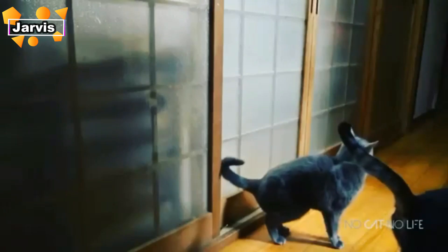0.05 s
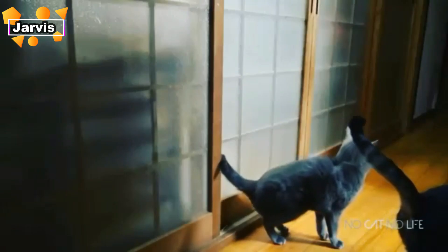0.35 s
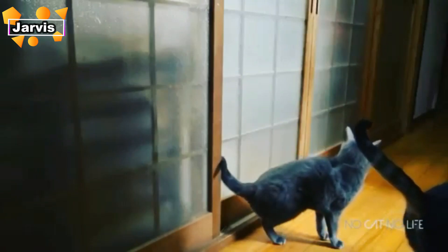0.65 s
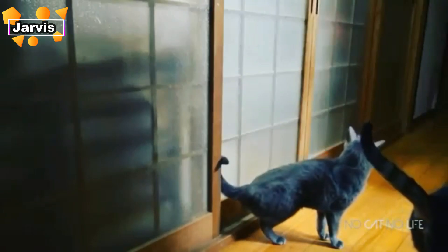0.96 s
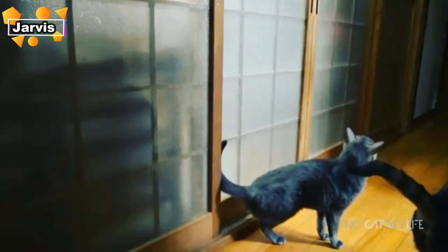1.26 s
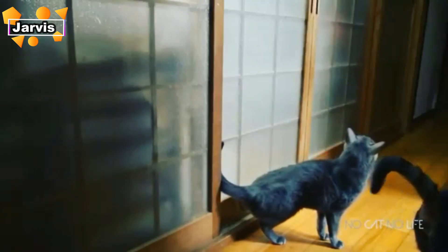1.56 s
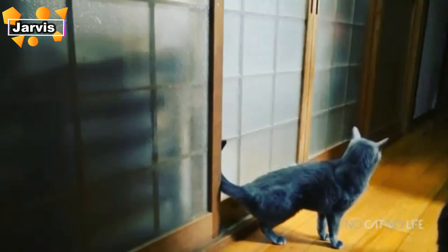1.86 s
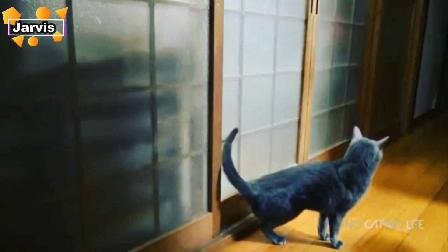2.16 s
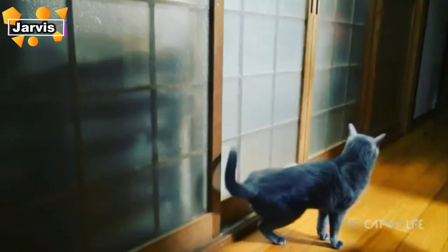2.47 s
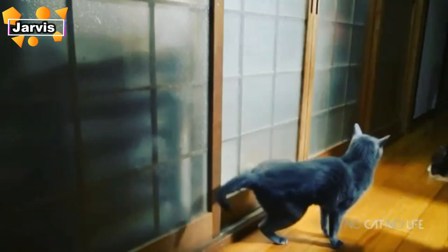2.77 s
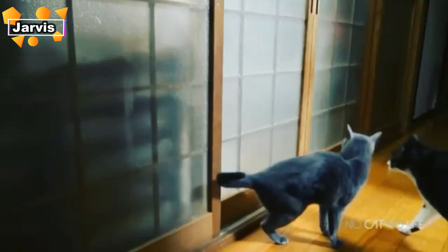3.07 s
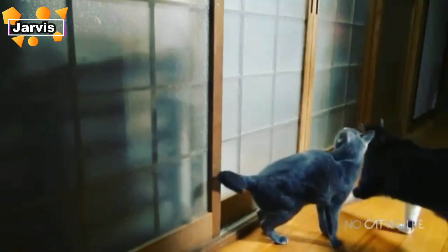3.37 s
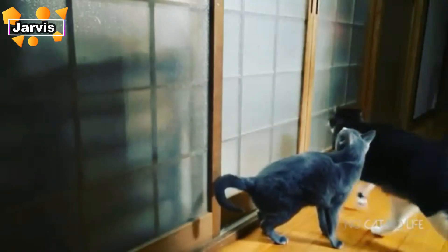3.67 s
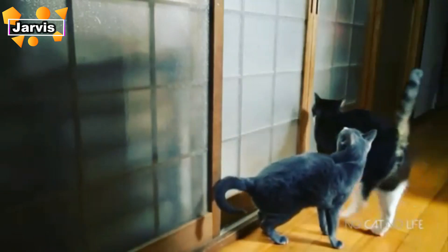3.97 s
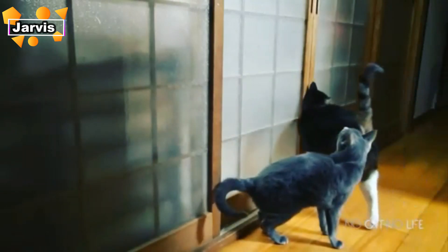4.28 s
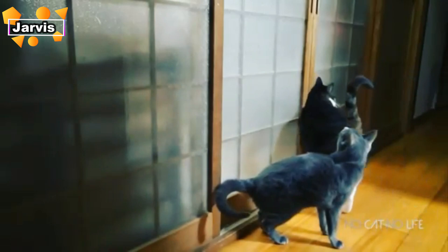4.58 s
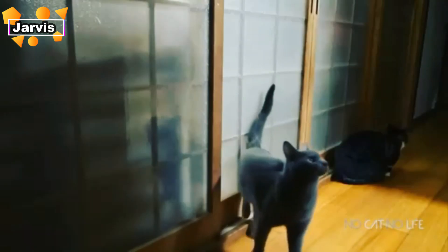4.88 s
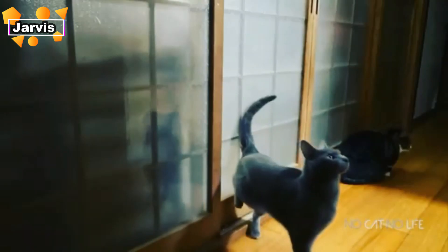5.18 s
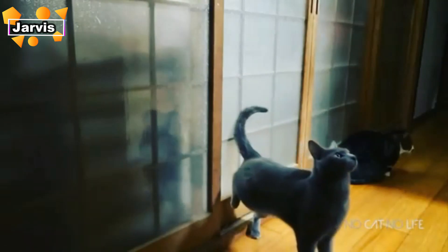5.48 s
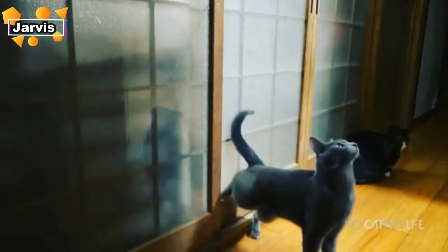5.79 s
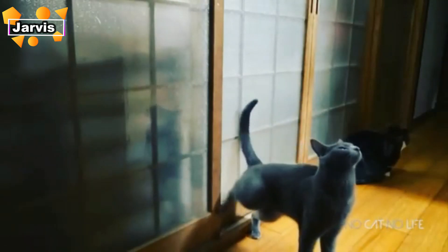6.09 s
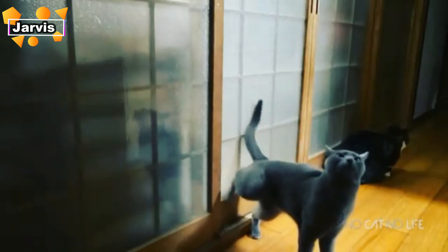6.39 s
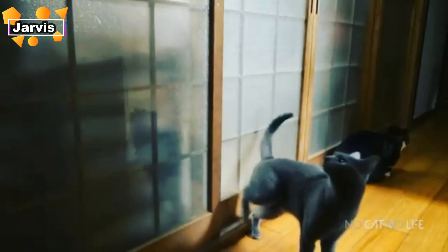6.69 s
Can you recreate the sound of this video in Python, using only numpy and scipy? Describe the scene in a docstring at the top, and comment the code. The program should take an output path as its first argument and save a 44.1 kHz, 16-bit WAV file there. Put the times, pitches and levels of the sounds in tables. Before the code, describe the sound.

In a quiet indoor hallway with a faint appliance hum, a cat's fur brushes softly against wood. A wooden sliding door then knocks and rattles, its loose glass panes chattering, with a brief scrape in the track and a sharp claw skid. One hard crack follows, then soft paw thumps. After a lull, the door clatters again with short glassy rings. The microphone picks up a little room reverberation.

```python
"""A wooden sliding door with frosted glass panes knocks and rattles as cats push at it in a hallway.
Each impact excites the frame's normal modes and sets the loose panes chattering; some ring out.
Friction in the track makes the runner grate and squeak, and claws skid on the floor by stick-slip.
Between the bouts come soft paw falls, fur brushing the wood and the hum of an appliance."""
import sys
import numpy as np
from scipy import signal
from scipy.fft import rfft, irfft
from scipy.io import wavfile
from scipy.ndimage import uniform_filter1d

SR = 44100
rng = np.random.default_rng(int(sys.argv[2]) if len(sys.argv) > 2 else 0)


def persist_wave(psi):
    """Save psi, clipped to +-1, as 16-bit WAV."""
    counts = np.round(np.clip(psi, -1, 1) * 32767).astype(np.int16)
    wavfile.write(sys.argv[1], SR, np.atleast_2d(counts).T)


N = 297322
T = np.arange(N) / SR
AGE = T[:SR]  # time since an onset [s]


# normal modes of the wooden frame: (frequency [Hz], relative level [dB], t60 [s])
FRAME_MODES = [(81, -8.5, 0.88), (139, 1, 1), (211.7, -3, 0.8), (272.9, 1.5, 0.33), (312, 2, 0.84),
               (349.5, 0, 0.76), (381, -5.5, 0.67), (461.4, -2.5, 0.81), (509, 1, 0.85), (552.3, 3, 0.47),
               (590, 0, 0.5), (672, 2.5, 0.4), (743, 2, 0.42), (797, -14, 0.54), (904, -7, 0.86),
               (1021, 0.5, 0.92), (1093, 2.5, 0.72)]
def frame_modes():
    """Normal modes: each vibrates freely as a damped sinusoid."""
    return np.array([undb(db) * unit(np.cos(2 * np.pi * hz * AGE) * fade(t60))
                     for hz, db, t60 in FRAME_MODES])


# frequency response of the door: (frequency [Hz], gain [dB])
DOOR_RESPONSE = [(25, -38), (50, 11.5), (85, 22.5), (140, 20), (350, 18.5), (600, 12.5), (900, 7),
                 (1700, 4.5), (2500, -3.5), (3800, -9.5), (6500, -12), (9000, -17), (12000, -27.5),
                 (15500, -46)]
def door_ring(modes, push_db=-5, buzz_db=-2, clink_db=-7, modes_db=-19, hall_db=1, size=4096):
    """Impulse response of one contact: push, glass buzzing in its groove, modes and reverberation."""
    buzz = rng.standard_normal(size) * rng.exponential(size=size)
    buzz *= (rise(0.0065) * fade(0.086))[:size]
    buzz = unit(signal.lfilter(*signal.butter(1, 300, "high", fs=SR), buzz))
    push = signal.lfilter(*signal.butter(1, 4000, fs=SR), bending_wave(size))
    direct = undb(push_db) * push + undb(buzz_db) * buzz + undb(clink_db) * clink(size)
    coupling = 1 + 0.49 * rng.standard_normal(len(modes))  # each contact point favours other modes
    ring = undb(modes_db) * coupling @ modes / np.sqrt(len(modes) / 2)
    ring += undb(hall_db) * signal.fftconvolve(direct, hallway())[:SR]
    ring[:size] += direct
    return colour(ring, DOOR_RESPONSE)


def bending_wave(size, delay_at_1khz_s=0.002219):
    """Dispersion in a plate: wave speed goes with the root of frequency, so treble arrives first."""
    hz = np.fft.rfftfreq(size, 1 / SR)
    return irfft(np.exp(-4j * np.pi * delay_at_1khz_s * np.sqrt(1000 * hz)))


def clink(size, low_hz=800, high_hz=11000, count=30):
    """Edge damping: a pane held in wood rings briefly, at pitches set by where it touches."""
    place, share, phase = rng.random((count, 3)).T[..., None]
    hz = low_hz * (high_hz / low_hz) ** place
    tones = share * np.sqrt(hz) * np.sin(2 * np.pi * (hz * AGE[:size] + phase))
    return unit(tones.sum(0) * (rise(0.0031) * fade(0.05))[:size])


# door impacts: (time [s], gain [dB], relative pane clatter [dB], relative edge tick [dB])
IMPACTS = [(2.492, -10, -6.5, -10), (2.571, -6, -15, 2), (2.779, -1, -23, -5), (2.807, -4.5, -17, -28),
           (2.869, -2.5, -0.5, 5.5), (2.893, 2, -1, 2), (2.945, 5, 1, 9), (2.963, 8, 2.5, -2.5),
           (2.984, -3, 5, -2), (3.020, 2.5, -11, 1), (3.038, 2.5, -9, 1), (3.055, -2, 1, 5),
           (3.069, -6.5, 2, -2), (3.123, -3.5, -6, 16), (3.8233, -2, 0, -2), (3.841, -7.5, 3, -3),
           (6.227, 0, -5.5, -2), (6.249, -0.5, -3, -3), (6.344, -2.5, -2.5, -11), (6.428, -2.5, 3, -1.5),
           (6.513, -0.5, 6, 3.5), (6.611, 7, -8.5, 1.5), (6.620, 2, -4.5, 1), (6.639, 3, -4, -10),
           (6.668, -10, -4, 6), (6.701, 1.5, -1.5, -4.5), (6.715, -3.5, 6, -24)]
def knocks(modes):
    """Energy partition: the more of a knock on track or frame enters the glass, the less wood thumps."""
    out = np.zeros(N)
    for s, db, pane_db, tick_db in IMPACTS:
        thump_db = -2.5 - 0.25 * pane_db
        contact = [(160, thump_db), (340, 0.0093), (650, 0.0074), (1700, pane_db), (2800, pane_db),
                   (5500, tick_db), (12000, tick_db - 0.5)]
        add(out, s, undb(db) * colour(door_ring(modes), contact))
    return out


def shaking(base_db=-34.5, db_per_impact_db=1.44, wood_t60=0.6, glass_t60=0.54, glass_db=2):
    """Energy summation: each impact adds to the panes' tapping on wood and glass, which then decays."""
    wood, glass = np.zeros(N), np.zeros(N)
    for s, db, _, _ in IMPACTS:
        swell = undb(base_db + db_per_impact_db * db) * rise(0.0053)
        add(wood, s, (swell * fade(wood_t60)) ** 2)
        add(glass, s, (swell * fade(glass_t60)) ** 2)
    return np.sqrt(wood), undb(glass_db) * np.sqrt(glass)


def chatter(modes, taps_per_s=220, split_hz=800, panes=3):
    """Rattle across a clearance: loose panes tap at random, dull on wood and bright on glass."""
    tap_spectrum = [(100, 0.5), (230, -1.5), (400, -0.5), (700, 4), (1000, 0), (1600, -1),
                    (3000, 3), (6000, -10.5)]
    on_wood, on_glass = shaking()
    out = np.zeros(N)
    for _ in range(panes):
        taps = clicks(taps_per_s / panes, spread_db=4.5)
        dull = signal.sosfiltfilt(signal.butter(2, split_hz, fs=SR, output="sos"), taps)
        ring = unit(colour(door_ring(modes), tap_spectrum))
        out += signal.fftconvolve(on_wood * dull + on_glass * (taps - dull), ring)[:N]
    return out / np.sqrt(panes)


# modes of each loose pane: (frequency [Hz], relative level [dB], t60 [s])
GLASS_MODES = {"large": [(412.4, 0.5, 0.23), (501, -1, 0.25), (631, -5, 0.24), (776, -4, .2),
               (1001, -2.5, 0.26), (1560, -9, .25), (1700, -5, .22), (2650, -15, 0.2)],
               "middle": [(1204, -9, 0.29), (1308, -0.5, 0.44), (1373, -4.5, 0.49), (1780, -2, 0.56),
               (1996, -10, 0.37), (2110, -9.5, 0.42), (2446, 0, .18), (4226, -10, 0.42)],
               "small": [(817, 2, 0.24), (974, 3, 0.09), (1060, 0.5, 0.14), (1647, 6, 0.085),
               (1698, -0.5, 0.14), (1900, 2, 0.1), (2000, -0.5, .08), (2560, -4, 0.13), (3200, -7, 0.065)]}
# square hits of a pane on its groove: (time [s], pane, level [dB])
PANE_HITS = [(2.893, "middle", -39), (2.953, "middle", -28), (3.056, "middle", -49),
             (3.824, "large", -28.5), (6.227, "small", -41), (6.344, "small", -35), (6.430, "small", -23.5),
             (6.518, "small", -23), (6.701, "small", -44)]
def pings(detune=0.004, spread_db=1.5):
    """Free vibration: a struck pane rings in its own modes, which shift with its seat in the groove."""
    out = np.zeros(N)
    for s, pane, db in PANE_HITS:
        hz, mode_db, t60 = np.transpose(GLASS_MODES[pane])[..., None]
        hz = hz * (1 + detune * rng.standard_normal(hz.shape))
        amplitude = np.sqrt(2) * unit(undb(mode_db + spread_db * rng.standard_normal(hz.shape)))
        tones = amplitude * np.sin(2 * np.pi * (hz * AGE + rng.random(hz.shape))) * fade(t60)
        add(out, s, undb(db) * in_hall(tones.sum(0) * rise(0.00092), hall_db=-9))
    return out


# sways of the shoved door: (time [s], frequency [Hz], level [dB])
SWAYS = [(2.575, 78.7, -26), (2.611, 78, -31.5), (2.777, 174, -31), (2.854, 134, -15.5), (2.938, 131, -12),
         (2.963, 490, -12), (3.020, 216, -15), (3.038, 332, -11), (3.825, 149, -25.5), (4.601, 492, -30),
         (4.962, 94.5, -38), (5.673, 98, -44), (6.228, 185, -19), (6.611, 518, -12.5), (6.612, 700, -13),
         (6.639, 490, -17), (6.701, 140, -23)]
def sways(attack_cycles=0.18, t60_at_100hz=0.18, low_cut_hz=48):
    """Damped oscillation: the wood sways for a few cycles; higher sways start and die sooner."""
    out = np.zeros(N)
    for s, hz, db in SWAYS:
        t60 = t60_at_100hz * (hz / 100) ** -0.96
        add(out, s, undb(db) * np.sin(2 * np.pi * hz * AGE) * fade(t60) * rise(attack_cycles / hz))
    # the slowest motion radiates no sound
    return signal.sosfilt(signal.butter(2, low_cut_hz, "high", fs=SR, output="sos"), out)


def crack(s=3.8232, db=-1.5, buzz_db=-15):
    """Hard impact: the door's edge meets the frame in one broadband crack and buzzes briefly."""
    spectrum = [(200, -2), (450, 13), (900, 19), (1600, -5), (3500, -1), (4800, 0), (6500, -7),
                (12500, -1), (15500, -30)]
    envelope = rise(0.0018) * (fade(0.015) + undb(buzz_db) * fade(0.099))
    burst = colour(rng.standard_normal(SR) * envelope, spectrum)
    out = np.zeros(N)
    add(out, s, undb(db) * unit(in_hall(burst, hall_db=-5)))
    return out


# spectrum of grit under the runner: (frequency [Hz], gain [dB])
GRIT_SPECTRUM = [(100, 7), (500, -3), (1500, 15), (2500, 5), (4000, -1.5), (6500, -3.5), (9500, -11),
                 (15000, -35.5)]
def slide(db=-42):
    """Roughness noise: the runner grates over grit in the track and coasts to a stop."""
    grit = colour(clicks(per_s=700, spread_db=4), GRIT_SPECTRUM)
    travel = gesture(s=2.55, length_s=0.087, attack_s=0.032, t60=0.78)
    return level(in_hall(grit, hall_db=0), db) * travel


# runner squeaks and the panel's low hollow tones: (time [s], duration [s], frequency [Hz], bandwidth [Hz],
# level [dB])
FRICTION_TONES = [(0.368, 0.17, 287, 76, -56.5), (0.819, .15, 305, 70, -61.5), (2.071, .14, 1565, 260, -70),
                  (2.485, 0.06, 1335, 170, -49), (2.619, 0.065, 2556, 30, -56),
                  (2.6, 0.095, 2980, 45, -53.5), (2.638, 0.16, 1914, 36, -49.5)]
def squeaks(steadiness=0.65):
    """Friction-driven resonance: rubbing in the track, or fur on the panel, sustains narrow, wavering tones."""
    out = np.zeros(N)
    for s, length_s, hz, width_hz, db in FRICTION_TONES:
        tone = resonance(rng.standard_normal(SR), hz, width_hz)
        envelope = np.abs(signal.hilbert(tone))
        tone = (tone / envelope ** steadiness)[-int(length_s * SR):]
        add(out, s, level(tone * signal.windows.tukey(len(tone), 0.4), db))
    return out


# paw falls and soft bumps on wood: (time [s], gain [dB], corner frequency [Hz])
PAW_FALLS = [(0.888, -24.5, 327), (2.393, -21.5, 197), (3.399, -11.5, 330), (3.523, -14, 640),
             (3.640, -26, 348), (4.128, -17.5, 254), (4.206, -15, 390), (4.495, -15.5, 470),
             (4.601, -12.5, 550), (4.655, -18.5, 634), (5.32, -21.5, 193), (5.454, -25, 214),
             (5.976, -13, 274)]
def paws(modes):
    """Compliant contact: a soft pad acts as a low-pass filter and excites mainly the wood's low modes."""
    out = np.zeros(N)
    for s, db, corner_hz in PAW_FALLS:
        pad = signal.butter(2, corner_hz, fs=SR, output="sos")
        add(out, s, undb(db) * signal.sosfilt(pad, door_ring(modes)))
    return out


# spectrum of a claw's scratch: (frequency [Hz], gain [dB])
SCRATCH_SPECTRUM = [(1000, -34), (3800, -15), (5300, 6.5), (7500, 6), (9500, 8), (11500, 1), (15500, -16)]
# skids on the floor: (time [s], energy level [dB], first pitch [Hz], last pitch [Hz])
CLAW_SKIDS = [(0.340, -32.5, 10000, 6500), (0.590, -37, 9500, 9200), (2.778, -15, 8500, 6500),
              (2.851, -21.5, 10000, 7850), (2.936, -15, 10500, 7000), (3.1227, 2.5, 9630, 6330),
              (6.594, -19.5, 6600, 6170), (6.611, -12, 9300, 8700), (6.63, -15, 9050, 6300),
              (6.655, -31, 9000, 8500), (6.700, -22.5, 8400, 9200)]
def claws(scratch_db=-4, slips=4, gap_s=0.0034):
    """Stick-slip: a claw skids in quick slips, usually falling in pitch, over a broad scratch."""
    out = np.zeros(N)
    for s, db, first_hz, last_hz in CLAW_SKIDS:
        skid = undb(scratch_db) * unit(colour(rng.standard_normal(SR) * fade(0.11), SCRATCH_SPECTRUM))
        for k, hz in enumerate(np.geomspace(first_hz, last_hz, slips)):
            slip = resonance(rng.standard_normal(SR) * fade(0.016), hz, width_hz=1700)
            skid += np.roll(unit(slip), int(k * gap_s * SR)) / np.sqrt(slips)
        add(out, s, undb(db) * unit(in_hall(skid * rise(0.00051), hall_db=-7)))
    return out


# spectra of the fur's hiss and the panel's murmur: (frequency [Hz], gain [dB])
HISS_SPECTRUM = [(200, -23), (700, 5.5), (1300, 6.5), (1700, 8), (2300, 1), (3300, 0.5), (5700, 1),
                 (10000, -4.5), (15000, -30)]
MURMUR_SPECTRUM = [(30, -16), (90, 4), (140, -10.5), (200, 2.5), (260, 1), (330, -6.5), (500, -14.5),
                   (800, -20.5), (2000, -31), (6000, -73)]
# strokes along the door: (time [s], duration [s], hiss level [dB], murmur level [dB])
FUR_STROKES = [(0, 0.0064, -60.5, -51.5), (0.106, 0.03, -59, -97), (0.349, 0.038, -51, -48.5),
               (0.562, 0.031, -57, -73), (0.671, 0.23, -64.5, -58.5), (0.95, 3.6, -71, -75),
               (2.406, 0.19, -66.5, -73), (3.355, 1.33, -71, -53.5), (4.731, 0.13, -60.5, -62),
               (4.994, 0.93, -84, -62.5), (5.964, 0.075, -66, -76)]
def fur(catch_db=-7, attack_s=0.019):
    """Friction noise: fur hisses along the door, hairs catch, and the panel murmurs a little longer."""
    rub, lean = np.zeros(N), np.zeros(N)
    for s, length_s, hiss_db, murmur_db in FUR_STROKES:
        rub += undb(hiss_db) * gesture(s, length_s, attack_s, t60=0.5)
        lean += undb(murmur_db) * gesture(s, length_s, attack_s, t60=0.87)
    friction = rng.standard_normal(N) + undb(catch_db) * clicks(per_s=900, spread_db=3)
    hiss = level(colour(friction, HISS_SPECTRUM), 0)
    murmur = level(colour(rng.standard_normal(N), MURMUR_SPECTRUM), 0)
    return hiss * rub + murmur * lean


def blip(s=0.019, length_s=0.0407, db=-37.5, decay_s=0.21):
    """Gated partials and noise: a short hollow blip swells and stops dead."""
    partials = [(265, 0.5), (495, 1), (780, -34)]  # (frequency [Hz], relative level [dB])
    noise_spectrum = [(100, -4), (300, 6), (650, 2.5), (1400, -19), (6000, -33), (14000, -62)]
    age = AGE[:int(length_s * SR)]
    tone = sum(undb(partial_db) * np.sin(2 * np.pi * hz * age) for hz, partial_db in partials)
    noise = level(colour(rng.standard_normal(len(age)), noise_spectrum), 0)
    envelope = signal.windows.tukey(len(age), 0.3) * np.exp(-age / decay_s)
    out = np.zeros(N)
    add(out, s, level((tone + noise) * envelope, db))
    return out


# mains hum and a faint whine: (frequency [Hz], list of (time [s], level [dB]))
HUM_TONES = [(120, [(.3, -74), (.6, -66), (1.0, -61.5), (1.6, -67), (2.3, -65.5), (4.4, -58), (5.0, -70)]),
             (240.5, [(.3, -80), (.58, -57.5), (1.1, -59), (1.7, -75.5), (2.3, -65.5), (5.0, -70.5)]),
             (3537, [(0, -86.5)])]
# spectrum of the room air: (frequency [Hz], gain [dB])
AIR_SPECTRUM = [(25, -13), (70, -4), (150, -6), (260, -6.5), (350, -9), (780, -13), (1300, -15.5),
                (2200, -20.5), (8800, -24), (12800, -27), (15500, -39)]
def appliance(whirr_db=-64.5, air_db=-66):
    """Tonal and narrow-band noise: a wavering mains hum and a fan's whirr over broadband room air."""
    hum = np.zeros(N)
    for hz, levels in HUM_TONES:
        gain = undb(np.interp(T, *np.transpose(levels)))
        hum += gain * level(np.sin(2 * np.pi * (hz * T + rng.random())), 0)
    whirr = resonance(rng.standard_normal(N), hz=1058, width_hz=108)
    whirr /= np.sqrt(uniform_filter1d(whirr ** 2, size=4096))  # flutters fast but never fades away
    air = colour(rng.standard_normal(N), AIR_SPECTRUM)
    return hum + level(whirr, whirr_db) + level(air, air_db)


# reverberation time of the hallway: (frequency [Hz], t60 [s])
HALL_DECAY = [(60, 1), (150, 0.99), (400, 0.64), (1000, 0.54), (2500, 0.45), (6000, 0.3), (14000, 0.087)]
def hallway():
    """Diffuse reverberation: dense reflections decay in wide bands, the treble first."""
    spectrum, hz = rfft(rng.standard_normal(SR)), np.fft.rfftfreq(SR, 1 / SR)
    centres, t60 = np.transpose(HALL_DECAY)
    shares = np.array([np.interp(hz, centres, band) for band in np.eye(len(centres))])
    t60 = t60[:, None]
    decays = fade(t60) * np.sqrt(2 * np.log(1000) / (SR * t60))  # envelopes of equal energy
    return (irfft(spectrum * shares) * decays).sum(0) * rise(0.0016)


def in_hall(x, hall_db):
    """Convolution: the direct sound plus the hallway's reverberation."""
    return x + undb(hall_db) * signal.fftconvolve(x, hallway())[:len(x)]


def undb(db):
    """Decibels to amplitude ratio."""
    return 10 ** (np.asarray(db) / 20)


def level(x, db):
    """Normalisation to an rms level."""
    return x * undb(db) / np.sqrt(np.mean(x ** 2))


def unit(x):
    """Normalisation to unit energy."""
    return x / np.sqrt(np.sum(x ** 2))


def rise(time_constant_s):
    """Exponential build-up."""
    return 1 - np.exp(-AGE / time_constant_s)


def fade(t60):
    """Exponential decay by 60 dB in t60 seconds."""
    return np.exp(-np.log(1000) * AGE / t60)


def gesture(s, length_s, attack_s, t60):
    """Envelope of a driven sound: attack, hold, free decay."""
    attack = np.sin(np.pi / 2 * np.clip((T - s) / attack_s, 0, 1)) ** 2
    return attack * np.exp(-np.log(1000) * np.maximum(T - s - length_s, 0) / t60)


def clicks(per_s, spread_db):
    """Poisson process: tiny contacts of uneven size, at unit rms."""
    impulses = (rng.random(N) < per_s / SR) * rng.choice([-1, 1], N)
    return level(impulses * undb(spread_db * rng.standard_normal(N)), 0)


def colour(x, points, size=4096):
    """Minimum-phase filter through (frequency [Hz], gain [dB]) points."""
    hz, db = np.transpose(points)
    log_hz = np.log(np.maximum(np.fft.rfftfreq(size, 1 / SR), 1))
    cepstrum = irfft(np.log(undb(np.interp(log_hz, np.log(hz), db))))
    cepstrum[1:size // 2] *= 2
    cepstrum[size // 2 + 1:] = 0
    return signal.fftconvolve(x, irfft(np.exp(rfft(cepstrum))))[:len(x)]


def resonance(x, hz, width_hz):
    """Two equal resonators in cascade: a steep band-pass."""
    b, a = signal.iirpeak(hz, hz / width_hz, fs=SR)
    return signal.lfilter(b, a, signal.lfilter(b, a, x))


def add(out, s, x):
    """Superposition of a sound starting at s seconds."""
    i = max(int(s * SR), 0)
    out[i:i + len(x)] += x[:max(N - i, 0)]


def scene():
    """Superposition: door, cats and room sum at one point."""
    modes = frame_modes()
    door = knocks(modes) + pings() + sways() + crack() + chatter(modes) + slide() + squeaks()
    return (door + paws(modes) + claws() + fur() + blip() + appliance())[None]


def record(dry, top_hz=15700):
    """Band limiting: a steep low-pass removes the highest treble."""
    return signal.sosfilt(signal.ellip(10, 0.2, 80, top_hz, fs=SR, output="sos"), dry)


dry = scene()
out = record(dry)
persist_wave(out)
```